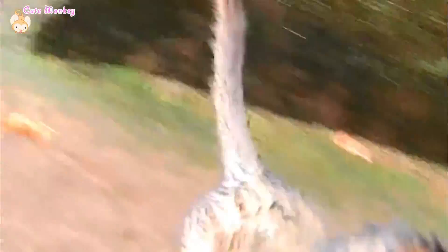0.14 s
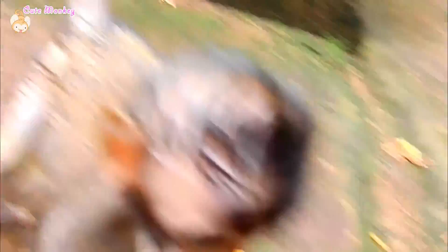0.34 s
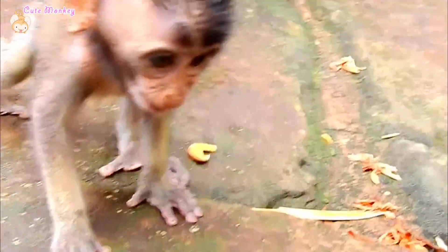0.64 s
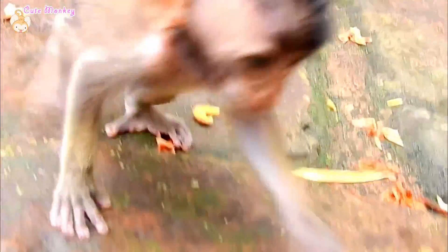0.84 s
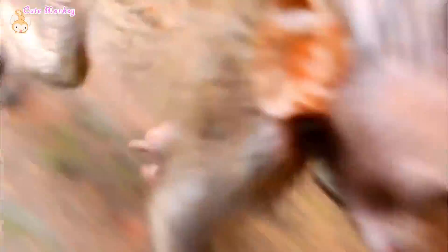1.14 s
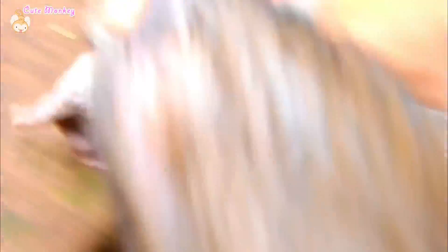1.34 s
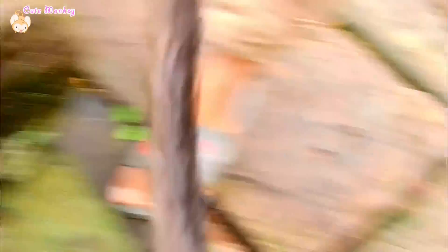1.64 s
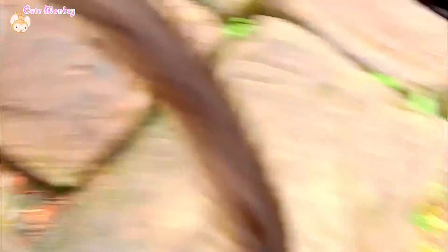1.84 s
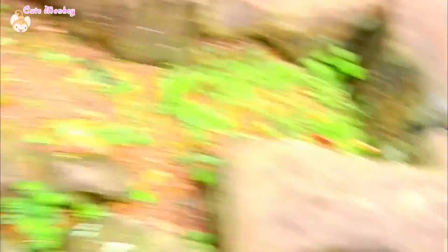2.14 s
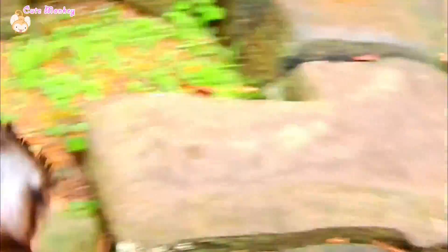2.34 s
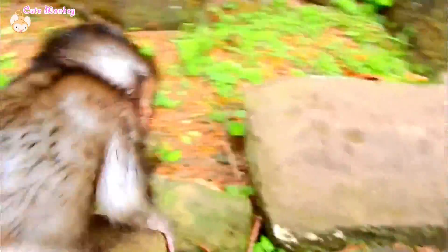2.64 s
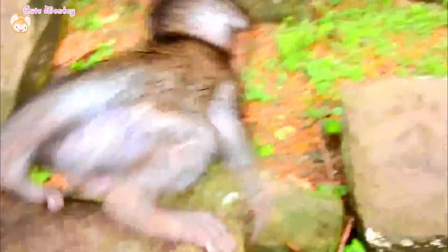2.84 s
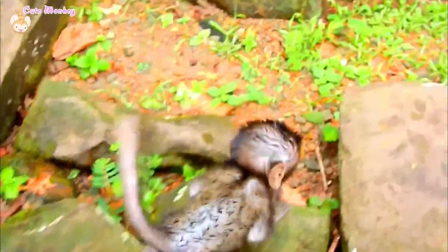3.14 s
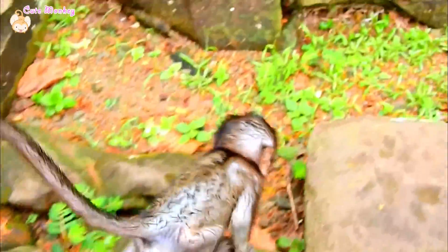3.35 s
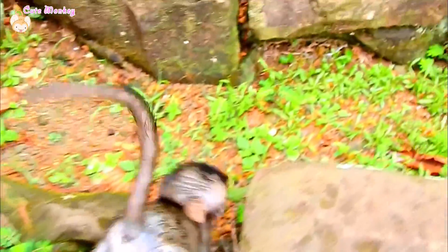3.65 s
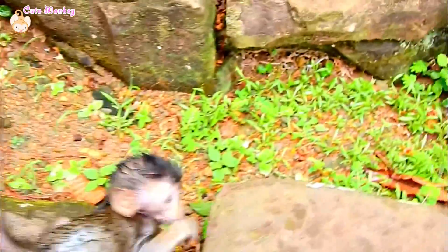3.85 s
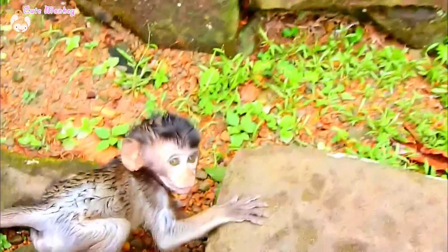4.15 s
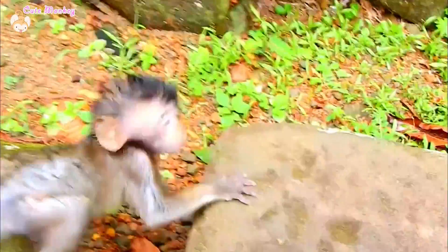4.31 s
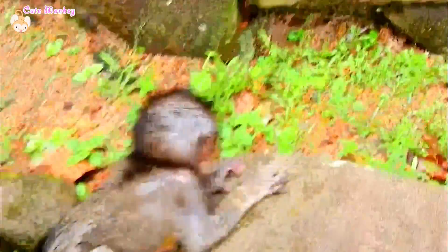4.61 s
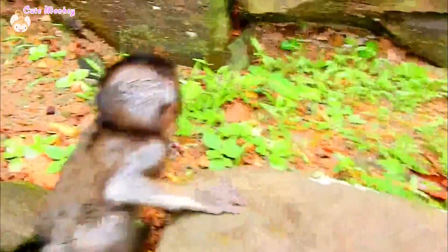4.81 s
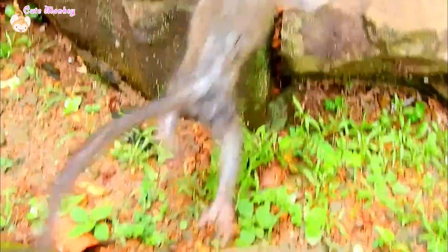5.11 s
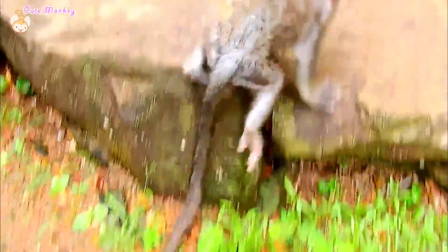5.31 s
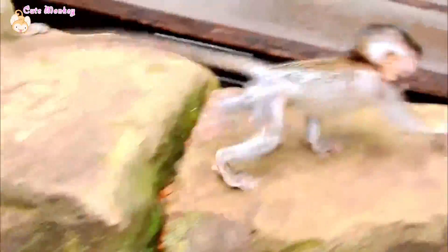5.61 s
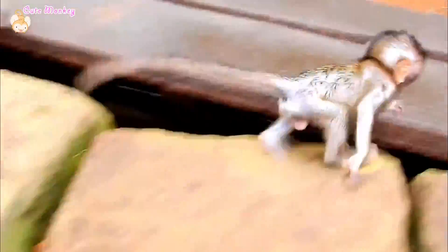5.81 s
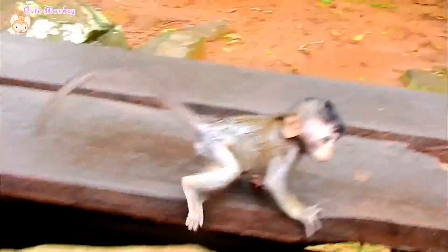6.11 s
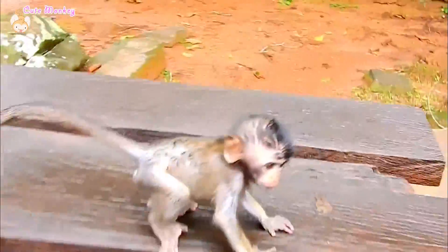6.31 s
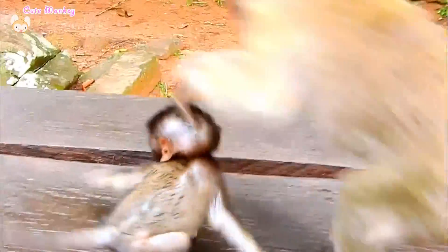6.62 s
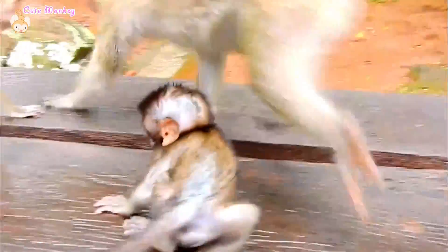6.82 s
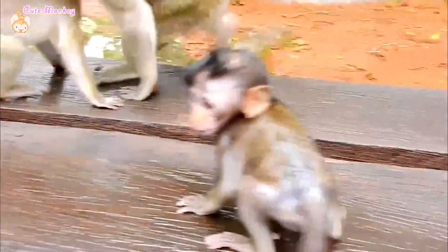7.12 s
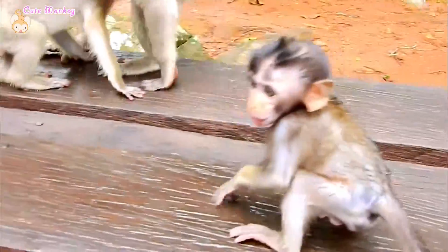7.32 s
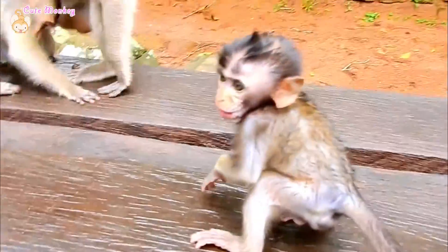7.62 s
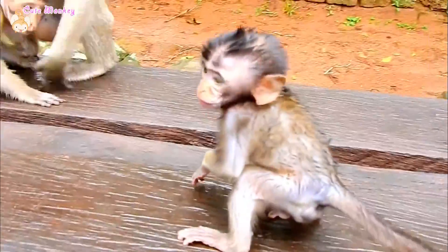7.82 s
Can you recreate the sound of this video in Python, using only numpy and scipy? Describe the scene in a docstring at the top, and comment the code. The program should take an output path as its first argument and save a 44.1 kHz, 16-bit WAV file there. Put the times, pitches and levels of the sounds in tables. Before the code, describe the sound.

Close, overloaded handheld sound of small monkeys chattering: high, hard squeaks, each with a low cluck just before it, repeating about eight times a second. Short scattered echoes return from stonework. Soles scuff and slap, feet shuffle over grit, and low puffs hit the microphone early on. After a quieter gap in the middle the chatter resumes with brief screeches and a tiny peep, then becomes sparse and distant over a faint low rumble.

```python
"""Young monkeys chatter among stone walls. A thin wavering whistle comes first, then runs of calls built from
short ringing snaps: a low cluck, then a sharp squeak, the nearest ones cracking in the microphone. Bands of
grainy noise make screeches, scuffs and shuffling. Near two seconds low noise puffs at the microphone and dull
knocks, short cracks of noise, begin: mostly sandalled steps. A soft coo and later a peep follow, and a hoarse
far sound ends it. Scattered echoes and a steady low rumble run beneath."""
import sys
import numpy as np
from scipy import signal
from scipy.fft import rfft, irfft
from scipy.io import wavfile
from scipy.ndimage import uniform_filter1d, map_coordinates

SR = 44100
rng = np.random.default_rng(int(sys.argv[2]) if len(sys.argv) > 2 else 0)


def dump_mix(stems):
    """Bounce the given channels to the path in sys.argv[1] as a 16-bit WAV at rate SR."""
    frames = np.atleast_2d(stems).T  # one column per channel
    limited = np.clip(frames, -1, 1)  # hard clip at full scale
    pcm = np.round(limited * 32767).astype(np.int16)
    wavfile.write(sys.argv[1], SR, pcm)


N = 351036
TIME = np.arange(N) / SR
LEFT_RIGHT = [[1], [-1]]  # adds a difference signal to the left, takes it from the right


def from_db(db):
    """Turn decibels into a gain."""
    return 10 ** (np.asarray(db) / 20)


def rms_one(x):
    """Scale a sound to an average (rms) strength of 1."""
    return x / np.sqrt(np.mean(x ** 2) + 1e-20)


def in_time(rows):
    """Draw straight lines between the rows, giving each column a value at every sample."""
    seconds, *columns = np.transpose(rows)
    return [np.interp(TIME, seconds, column) for column in columns]


def at_hz(points, hz):
    """Read a curve over pitch, with equal steps for equal pitch ratios."""
    point_hz, value = np.transpose(points)
    return np.interp(np.log(hz + 1e-9), np.log(point_hz), value)


def band(x, low_hz, high_hz, order=2):
    """Keep only the sound between two pitches (Butterworth filter)."""
    edges_hz = [low_hz, min(high_hz, SR / 2 - 1000)]
    return signal.sosfilt(signal.butter(order, edges_hz, "band", fs=SR, output="sos"), x)


def add(out, start_s, sound):
    """Mix a sound in from its start time, cutting it off at the end of the scene."""
    i = max(int(round(start_s * SR)), 0)
    out[..., i:i + sound.shape[-1]] += sound[..., :max(N - i, 0)]


def drift(rate):
    """A random wandering line with an rms of 1 and this many turning points per second."""
    knots = rng.standard_normal(int(N / SR * rate) + 2)
    return rms_one(np.interp(TIME * rate, np.arange(len(knots)), knots))


def swell(start_s, end_s, level_db, attack_s, release_s):
    """A gain that rises, holds and falls."""
    rise, fall = (TIME - start_s) / attack_s, (end_s - TIME) / release_s
    return from_db(level_db) * np.clip(np.minimum(rise, fall), 0, 1)


# how alike noise is on the left and right: pitch_hz, likeness (-1 to 1, no unit)
LIKENESS = [(100, .6), (600, 0.91), (1400, 0.87), (3000, 0.76), (6000, 0.22), (12000, 0.1)]


def likeness(low_hz, high_hz):
    """Likeness of the two sides at the middle of a band."""
    return np.clip(at_hz(LIKENESS, np.sqrt(low_hz * high_hz)), -1, 1)


def air(low_hz, high_hz, order=3):
    """A band of stereo noise; a shared and an opposed part set how alike the sides are."""
    alike = likeness(low_hz, high_hz)
    mid, side = band(rng.standard_normal((2, N)), low_hz, high_hz, order=order)
    return rms_one(np.sqrt(1 + alike) * mid + np.sqrt(1 - alike) * side * LEFT_RIGHT)


# the three noise bands of friction sounds: low_hz, high_hz
FRICTION_BANDS = [(650, 2020), (2000, 4510), (4400, 7650)]


def grit(gains, grain_db, fizz_db, clump_db, clumps_per_s, count=3):
    """Friction noise: narrow bands flare and fade separately, and one fast grain shakes them all."""
    out = gains[-1] * from_db(fizz_db) * air(7850, 9700, order=2)
    for gain, (low, high) in zip(gains, FRICTION_BANDS):
        edges = np.geomspace(low, high, count + 1)
        parts = [air(a, b, order=2) * from_db(clump_db * drift(clumps_per_s)) for a, b in zip(edges, edges[1:])]
        out = out + gain * rms_one(sum(parts))
    return out * rms_one(from_db(grain_db * drift(700)))


# colour of the distant rumble: pitch_hz, relative_level_db (per hertz)
RUMBLE_COLOUR = [(15, -47), (25, -19.5), (40, 1.5), (76, 5), (109, 7.5), (192, -1.5), (452, -9.5),
                 (557, -13.5), (697, -48), (900, -42.5), (1170, -37), (1980, -120)]
RUMBLE_DB = -57.5  # overall level


def rumble():
    """Far, steady low noise, partly different on the two sides."""
    hz = np.arange(N // 2 + 1) * SR / N
    spectrum = rfft(rng.standard_normal((2, N))) * from_db(at_hz(RUMBLE_COLOUR, hz))
    mid, side = irfft(spectrum, N)
    return from_db(RUMBLE_DB) * rms_one(mid + .5 * side * LEFT_RIGHT)


PUFF_BAND_HZ = (52, 156)
PUFF_EDGE_S = .035  # rise and fall time
# puffs of air on the microphone: start_s, end_s, level_db
PUFFS = [(1.885, 2.099, -35), (2.1, 2.308, -33), (2.506, 2.618, -44.5)]


def puff():
    """Moving air buffets each side of the microphone with its own low noise."""
    gusts = sum(swell(start, end, db, PUFF_EDGE_S, PUFF_EDGE_S) for start, end, db in PUFFS)
    return gusts * rms_one(band(rng.standard_normal((2, N)), *PUFF_BAND_HZ))


FAR_START_S, FAR_END_S = 7.70, 8.02
FAR_DB, FAR_ATTACK_S, FAR_RELEASE_S = -42, 0.12, 0.24
# broad resonances of the far hoarse sound: pitch_hz, width_hz, relative_level_db
FAR_RESONANCES = [(1156, 176, -16), (1660, 570, -1), (2800, 760, -8.5)]


def far_rasp():
    """A hoarse sound further off: noise in a few broad resonances."""
    noise = 0
    for hz, width, db in FAR_RESONANCES:
        noise = noise + from_db(db) * air(hz - width / 2, hz + width / 2, order=2)
    return swell(FAR_START_S, FAR_END_S, FAR_DB, FAR_ATTACK_S, FAR_RELEASE_S) * rms_one(noise)


SHUFFLE_DB, BETWEEN_DB, RUSTLE_DB = -2, -6, -0.5  # trims of the dull, middle and bright bands
# dull part of the shuffling on the ground: time_s, level_db (before its trim)
SHUFFLE = [(0.0, -48), (1.48, -51), (1.93, -42), (2.37, -40.5), (3.3, -50.5), (4.19, -53), (4.41, -44.5),
           (4.63, -52), (5.79, -54), (6.1, -44), (6.5, -57.5), (7.18, -58), (7.76, -55.5), (7.96, -56.5)]
# bright rustle over it: time_s, level_db (before its trim)
RUSTLE = [(0.0, -42), (0.31, -53), (0.64, -36.5), (0.89, -44), (2.79, -36), (3.26, -50), (3.55, -73.5),
          (4.17, -60), (4.48, -41.5), (5.3, -43.5), (5.67, -59.5), (6.08, -42), (6.87, -74), (7.07, -81),
          (7.21, -71), (7.47, -66), (7.63, -60.5), (7.96, -65)]


def shuffle(hiss_db=-31):
    """Shuffling on gritty ground, with a faint hiss of very high noise over it."""
    dull, bright = in_time(SHUFFLE)[0], in_time(RUSTLE)[0]
    between = (np.minimum(dull, bright) + bright) / 2
    gains = from_db([dull + SHUFFLE_DB, between + BETWEEN_DB, bright + RUSTLE_DB])
    hiss = from_db(bright + hiss_db) * air(9500, 14500, order=4)
    return grit(gains, grain_db=3.0, fizz_db=-19.5, clump_db=4.0, clumps_per_s=25) + hiss


# echoes from the stonework: low_hz, high_hz, fade_s (time to drop 60 dB), level_db
WALLS = [(493, 1280, 0.37, -6.5), (1760, 4040, 0.43, -5), (4573, 7400, 0.43, -13.5),
         (7400, 36000, 0.259, -15)]


def wall_echo(build_s):
    """Scattered echoes off rough stone, partly different at each side, dying band by band."""
    t, echo = TIME[:SR // 2], 0
    for low, high, fade_s, db in WALLS:
        alike = likeness(low, high)
        mid, side = band(rng.standard_normal((2, len(t))), low, high, order=3)
        shape = from_db(-60 * t / fade_s) * (1 - np.exp(-t / build_s))
        tail = np.sqrt((1 + alike) / 2) * mid + np.sqrt((1 - alike) / 2) * side * LEFT_RIGHT
        echo = echo + from_db(db) * tail * shape / np.linalg.norm(shape)
    return echo


def walls(x, build_s=0.00054, size=14000):
    """Everyone keeps moving, so each stretch of size samples meets a new pattern of echoes."""
    out = np.zeros((2, N))
    for i in range(0, N, size):
        add(out, i / SR, signal.fftconvolve(x[None, i:i + size], wall_echo(build_s), axes=1))
    return out


# dull knocks: footfalls, and the low body of one loud cluck at 4.301 s:
# start_s, level_db (before gain_db), pitch_hz, left_over_right_db
KNOCKS = [(2.077, -15.5, 1009, -3), (2.288, -11, 1010, 3.5), (2.405, -18.5, 1266, 1), (2.448, -17, 1330, 2),
          (2.539, -16, 1007, -1.5), (2.556, -19.5, 790, 0), (2.607, -20.5, 1040, .5),
          (3.057, -22, 1296, -4), (3.530, -18.5, 1122, -12), (4.225, -17, 935, -6.5),
          (4.259, -16.5, 900, -10), (4.301, -13, 1500, -1), (4.463, -22.5, 1070, -2),
          (5.365, -33.5, 704, -3), (6.265, -24, 767, 1), (6.644, -12.5, 905, -3.5),
          (6.679, -25.5, 1110, -3.5), (7.416, -30, 797, -2.5)]


def knocks(decay_s=0.0037, gain_db=-5.5, width=1.516, snap_db=-14):
    """A dull crack of noise that dies in milliseconds, with a brighter edge, as when a sole slaps stone."""
    out, t = np.zeros((2, N)), TIME[:SR // 20]
    for start, db, hz, pan_db in KNOCKS:
        contact = rng.standard_normal(len(t)) * np.exp(-t / decay_s)
        dull = band(contact, hz / width, hz * width, order=3)
        knock = dull + from_db(snap_db) * band(contact, 1744, 2820)
        knock = knock * np.sqrt(decay_s * SR) / np.linalg.norm(knock)
        sides = from_db(np.array([[pan_db / 2], [-pan_db / 2]]))
        add(out, start, from_db(db + gain_db) * sides / sides.mean() * knock)
    return out


SCREECH_FALL_DB = 11  # per octave away from the centre
# harsh screeches: start_s, end_s, level_db (at the centre pitch), centre_hz, swell_db (start to end)
SCREECHES = [(0.73, 0.76, -27, 6250, 8), (1.118, 1.122, -20, 3060, 18.5), (2.087, 2.099, -19, 5500, 0.5),
             (2.169, 2.294, -21.5, 3700, 12.5), (2.395, 2.424, -18.5, 2200, 3),
             (5.068, 5.16, -33, 4640, -4), (5.843, 5.914, -26, 4140, 2.5), (5.916, 5.961, -15, 3770, -13),
             (6.16, 6.176, -20.5, 6040, -17), (6.182, 6.245, -28.5, 6060, 3), (6.424, 6.44, -20.5, 5900, 6)]
# soles scuffing over grit: start_s, end_s, level_db (before the colour)
SCUFFS = [(0.382, 0.436, -34), (0.873, 0.899, -26.5), (1.455, 1.506, -30), (1.647, 1.682, -25.5),
          (1.823, 1.88, -25), (1.956, 2.008, -30.5), (2.284, 2.304, -20), (2.556, 2.564, -26),
          (2.616, 2.624, -26.5), (4.473, 4.49, -25.5), (5.946, 6.003, -21), (6.28, 6.305, -31.5),
          (6.639, 6.72, -40.5), (7.43, 7.461, -43.5), (7.805, 7.82, -37.5)]
# colour of every scuff, one value per friction band: level_db
SCUFF_COLOUR = (-9.5, -7.5, 1.5)


def rasps(edge_s=0.0088, screech_db=0.0, scuff_db=0.0):
    """Bursts of friction noise: screeches gather about their own centre, scuffs share one colour."""
    power = np.zeros((len(FRICTION_BANDS), N))
    band_hz = np.sqrt(np.prod(FRICTION_BANDS, axis=1))[:, None]
    for start, end, db, hz, swell_db in SCREECHES:
        rise = swell_db * np.linspace(-.5, .5, max(int((end - start) * SR), 1))
        fall = SCREECH_FALL_DB * abs(np.log2(band_hz / hz))
        add(power, start, from_db(db + screech_db + rise - fall) ** 2)
    for start, end, db in SCUFFS:
        scuff_power = from_db(db + scuff_db + np.array(SCUFF_COLOUR)) ** 2
        power[:, int(start * SR):int(end * SR)] += scuff_power[:, None]
    # averaging twice softens the edges of each burst
    width = max(int(edge_s * SR), 1)
    gains = uniform_filter1d(uniform_filter1d(np.sqrt(power), width), 2 * width)
    return grit(gains, grain_db=2.0, fizz_db=-19.0, clump_db=1.5, clumps_per_s=90)


def aslant(pair, lag_s):
    """A sound from one side reaches the right a little later."""
    hz = np.arange(N // 2 + 1) * SR / N
    late_right = irfft(rfft(pair[1]) * np.exp(-2j * np.pi * lag_s * hz), N)
    return np.array([pair[0], late_right])


def clear_call(curve, harmonics_db, jitter, flutter_db=2.5):
    """A nearly pure voice built from a few harmonics, a little unsteady in pitch and strength."""
    hz, db = in_time(curve)
    phase = 2 * np.pi * np.cumsum(hz * (1 + jitter * drift(900))) / SR
    voice = sum(from_db(level) * np.sin(k * phase) for k, level in enumerate(harmonics_db, 1))
    sounding = (TIME > curve[0][0]) * (TIME < curve[-1][0])
    return from_db(db) * sounding * rms_one(voice * from_db(flutter_db * drift(200)))


# path of the thin whistle: time_s, base_pitch_hz, level_db
WHISTLE = [(.040, 3240, -57), (.044, 3240, -16), (.050, 3500, -16.5), (.063, 3530, -18),
           (.075, 3656, -36.5), (.084, 3580, -15), (.088, 2990, -19), (.092, 2730, -21), (.097, 2700, -55)]


def whistle():
    """A thin whistle whose second harmonic is by far the strongest."""
    return clear_call(WHISTLE, [-45.5, 5.5, -31, -34], jitter=0.0098)


# path of the soft coo: time_s, base_pitch_hz, level_db
COO = [(4.472, 1727, -55), (4.495, 1840, -35), (4.53, 1930, -39), (4.545, 1933, -40.5), (4.565, 1847, -27),
       (4.582, 1920, -33.5), (4.597, 2050, -59)]


def coo():
    """A soft call with two strong harmonics and a weak third."""
    return clear_call(COO, [-5, 0, -22], jitter=0.017, flutter_db=3.5)


# path of the short peep: time_s, pitch_hz, level_db
PEEP = [(6.612, 3740, -51), (6.619, 3370, -41), (6.623, 3420, -49), (6.628, 3520, -42), (6.633, 3500, -47)]


def peep():
    """A tiny call made of a single wavering tone."""
    return clear_call(PEEP, [0], jitter=0.014)


# within a fast run, a softer call falls between two loud ones
RUN_GAP_S, RUN_END_S = (.105, .155), 6.3
SOFT_AFTER_S, SOFT_DROP_DB, SOFT_HZ = .061, 22, 6700  # time and pitch scatter a little
SOFT_CLUCK_DROP_DB, SOFT_CLUCK_HZ = 37.5, 3300
# loud calls, levels before mixing:
# squeak_s, squeak_db, squeak_hz, raggedness (0 to 1, no unit), cluck_db, cluck_hz
CHATTER = [(0.3535, 1.5, 5980, 0.12, -25, 3720), (0.482, 10.5, 6170, 0.07, -20.5, 3570),
           (0.5368, -5.5, 7100, 0.6, -27, 3170), (0.6017, 6, 5870, 0.8, -12, 3250),
           (0.6499, -11, 5960, 0.4, -35, 3360), (0.669, -10.5, 6450, 0.4, -22, 3550),
           (0.7172, 2, 5800, 0.8, -29, 3670), (0.7435, -7.5, 6350, .7, -35, 3400),
           (0.768, -5.5, 6210, 0.26, -34, 2800), (0.8346, 4.5, 5860, 0.96, -18, 3200),
           (.9524, -2, 5470, 0.7, -27, 3770), (1.0687, -1.5, 5900, 1, -18.5, 3000),
           (1.1158, -9.5, 6280, .45, -17.5, 2960), (1.1840, 1, 6100, 1, -20, 3040),
           (1.2545, -14, 6070, .8, -21, 3600), (1.305, 2.5, 5530, 0.55, -14.5, 3430),
           (1.3397, -19, 5200, .6, -26, 3490), (1.3661, -4, 6296, 0.1, -25, 3220),
           (1.3821, -10, 6970, 0.5, -25, 3220), (1.4332, -5, 5640, 0.4, -25, 3000),
           (1.5540, -3.5, 6200, 0.96, -21.5, 3160), (1.6794, 3.5, 5980, 0.7, -14, 2120),
           (1.8000, 3, 6300, 0.11, -20.5, 2730), (1.854, -3.5, 6450, .6, -24.5, 3000),
           (1.9201, 3.5, 6600, 0.74, -16.5, 2700), (2.0503, 1, 5860, 0.4, -11.5, 1830),
           (2.109, -12, 7200, 0.26, -40, 3000), (2.1786, -5, 5860, 1, -17.5, 2550),
           (2.2193, -10.5, 5260, 0.5, -15, 2800), (2.303, 5, 6600, 0.4, -9.5, 2560),
           (2.428, 1.5, 5700, 0.4, -28, 2650), (2.5600, -9.5, 5100, 0.8, -30, 1360),
           (2.6824, 3, 6300, 0.47, -23.5, 3800), (2.8168, 3, 6680, 0.35, -10.5, 2740),
           (2.955, 9.5, 7200, 0.28, -10.5, 2060), (3.086, 2.5, 6740, 0.7, -23.5, 2730),
           (3.212, 4, 6220, 0.23, -27.5, 2550), (3.3559, 3.5, 5890, 0.14, -16, 3408),
           (4.3113, 6, 7170, 0.09, -12.5, 2470), (4.4457, 2.5, 6600, 0.5, -16, 2230),
           (4.5548, -8, 6420, 0.6, -25, 2930), (4.6780, 1, 6060, 0.5, -31, 3430),
           (4.8035, 2, 5860, 0.18, -20.5, 2970), (4.9365, -20, 6260, 0.4, -40, 3000),
           (5.0166, -25, 4470, 0.6, -29.5, 3120), (5.0705, -5, 5400, 0.47, -24, 3280),
           (5.205, -3.5, 5980, 0.5, -52, 3000), (5.3516, -12.5, 6070, 0.6, -38, 2340),
           (5.4790, -19.5, 5850, 0.36, -52, 3025), (5.7419, -13, 5600, 0.24, -33.5, 2180),
           (5.872, -9.5, 6100, 0.5, -18.5, 3020), (5.8855, -8, 6340, 0.4, -36, 3000),
           (6.0439, -2, 5860, .05, -14.5, 3200), (6.1692, 3, 6430, 0.47, -16, 2580),
           (6.2950, -1, 5950, 1, -24, 2630), (6.4336, 0, 7000, 0.97, -20, 2290),
           (6.5579, 2, 6120, 0.39, -29, 3520), (6.8647, -8, 6200, 0, -37, 2870),
           (6.981, -4, 5650, 0.43, -36.5, 2940), (7.1207, -13, 5480, .35, -35, 2170),
           (7.4436, -13.5, 5130, 0.37, -39, 2495), (7.5818, -10, 5660, .05, -39, 2420)]


def all_calls(scatter_s=.003, detune=.05, ragged=.5, stray_db=19, stray_cluck_db=8, count=70):
    """Loud calls, softer ones in the gaps of fast runs, and stray ticks, louder as the rustle grows."""
    soft = []
    chances = rng.standard_normal((len(CHATTER), 2))
    for (s, db, *_), (next_s, *_), (late, tone) in zip(CHATTER, CHATTER[1:], chances):
        if RUN_GAP_S[0] < next_s - s < RUN_GAP_S[1] and s < RUN_END_S:
            pitch = np.exp(detune * tone)
            soft.append((s + SOFT_AFTER_S + scatter_s * late, db - SOFT_DROP_DB, SOFT_HZ * pitch,
                         ragged, db - SOFT_CLUCK_DROP_DB, SOFT_CLUCK_HZ * pitch))
    stray_times = rng.uniform(CHATTER[0][0], CHATTER[-1][0], count)
    for s, tone in zip(stray_times, rng.standard_normal(count)):
        bustle_db = np.interp(s, *np.transpose(RUSTLE))
        pitch = np.exp(2 * detune * tone)
        soft.append((s, bustle_db + stray_db, SOFT_HZ * pitch,
                     ragged, bustle_db + stray_cluck_db, SOFT_CLUCK_HZ * pitch))
    return list(CHATTER) + soft


def throat_pulse(hz, cycles, droop=0.0021):
    """One ringing snap, centred in 256 samples: it swells, sags in pitch and dies within a few cycles."""
    turns = np.arange(-128, 128) * hz / SR
    bell = np.exp(-.5 * (turns / cycles) ** 2)
    return bell * np.cos(2 * np.pi * (turns - droop * turns ** 2 + rng.random()))


def snap_cluster(hz, cycles, spread_s, scatter, count, uneven_db=1.0):
    """A ragged cluster of snaps about the middle of its frame, scaled to a total energy of 1."""
    out = np.zeros(1024)
    for when, size, tone in rng.standard_normal((count, 3)):
        pulse = throat_pulse(hz * np.exp(scatter * tone), cycles)
        room = len(out) - len(pulse)
        i = int(np.clip(room / 2 + when * spread_s * SR, 0, room))
        out[i:i + len(pulse)] += from_db(uneven_db * size) * pulse
    return out / np.linalg.norm(out)


CLUCK_LEAD_S = .0085  # before the squeak's main snap


def clucks(calls, snap_s=0.0003, spread_s=0.0014, gain_db=17.0):
    """Lower ragged snapping just ahead of each squeak, with snaps about equally short at every pitch."""
    out = np.zeros(N)
    for s, _, _, _, db, hz in calls:
        cluster = snap_cluster(hz, hz * snap_s, spread_s, scatter=0.062, count=7)
        add(out, s - CLUCK_LEAD_S - len(cluster) / 2 / SR, from_db(db + gain_db) * cluster)
    return band(out, 900, 4200)


RAGGED_LAG_S = .0011  # after the squeak's main snap
SQUEAK_BAND_HZ = (3700, 7900)


def squeaks(calls, cycles=1.23, rasp_cycles=0.98, spread_s=0.0018, pulse_db=1.77, rasp_db=0.0,
            overtone_db=-32, overtone_growth=1.0):
    """One hard snap, an overtone that grows faster than it, and a ragged cluster of snaps around it."""
    out, overtones = np.zeros((2, N))
    for s, db, hz, ragged, _, _ in calls:
        ragged = np.clip(ragged, .01, .99)
        snap = from_db(db) * throat_pulse(hz, cycles)
        cluster = snap_cluster(hz, rasp_cycles, spread_s, scatter=0.082, count=12, uneven_db=5.5)
        cluster = np.linalg.norm(snap) * cluster
        overtone = from_db(db + overtone_db + overtone_growth * db) * throat_pulse(2 * hz, cycles)
        snap_start = s - len(snap) / 2 / SR
        cluster_start = s + RAGGED_LAG_S - len(cluster) / 2 / SR
        # raggedness shares the energy between the single snap and the cluster
        add(out, snap_start, from_db(pulse_db) * np.sqrt(1 - ragged) * snap)
        add(out, cluster_start, from_db(rasp_db) * np.sqrt(ragged) * cluster)
        add(overtones, snap_start, overtone)
    return band(out, *SQUEAK_BAND_HZ, order=3) + overtones


def wandering(voice, lag_s=.000012):
    """The callers run to and fro, so their sound reaches the right a hair earlier or later."""
    shifted = map_coordinates(voice, [np.arange(N) - lag_s * SR * drift(5)], order=3)
    return np.array([voice, shifted]) * from_db([[-.6], [.6]])


# the nearest squeaks crack across all pitches: time_s, height_db (before the left and right levels)
CRACKS = [(0.3536, 4.5), (0.4813, 10.5), (0.4836, 6), (.5987, 5), (1.3055, -1), (1.679, 1.5), (1.8, 6.5),
          (1.92, 22), (2.0494, 1), (2.4276, 7.5), (3.2137, -2.5)]


def cracks(near):
    """Overload: at the very top of a loud squeak one sample kicks the other way."""
    out, reach = np.zeros(N), SR // 2000
    for s, db in CRACKS:
        i = int(s * SR) - reach
        i += np.argmax(abs(near[i:i + 2 * reach]))
        out[i] = -np.sign(near[i]) * from_db(db)
    return out


# the farther the caller, the more echo its voice carries: time_s, voice_into_echo_db
DISTANCE = [(0, 2), (.5, -8), (2.7, -2), (3.36, -6), (4.4, -5), (5.2, 6.5), (5.75, 6), (6.1, -5.5),
            (6.56, -1.5), (7.6, 6.5)]


def scene():
    """Mix voices, knocks and rasps close by, their echoes, and the background."""
    calls = all_calls()
    voices = squeaks(calls) + clucks(calls) + whistle() + coo() + peep()
    dull_knocks = knocks()
    harsh = aslant(rasps(), lag_s=.00004)
    # the cracks are stronger on the right
    direct = wandering(voices) + cracks(voices) * from_db([[-7], [3]])
    echoing_voices = voices * from_db(in_time(DISTANCE)[0])
    echoes = walls(echoing_voices + from_db(1.5) * dull_knocks.mean(axis=0) + from_db(-5) * harsh[0])
    return direct + dull_knocks + harsh + echoes + shuffle() + far_rasp() + puff() + rumble()


OVERLOAD = .84  # clipping height, where 1 is full scale
CUTOFF_HZ = 16900


def record(dry):
    """Flatten the peaks that pass the overload height, then cut the highest treble."""
    clipped = np.clip(dry, -OVERLOAD, OVERLOAD)
    return signal.sosfilt(signal.cheby2(14, 70, CUTOFF_HZ, fs=SR, output="sos"), clipped)


dry = scene()
out = record(dry)
dump_mix(out)
```